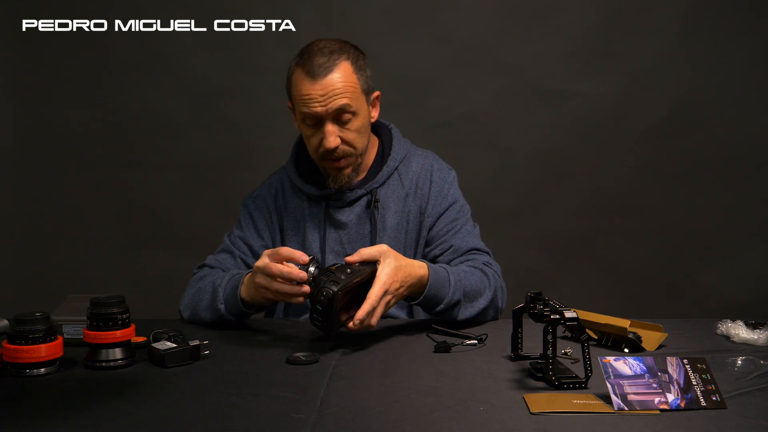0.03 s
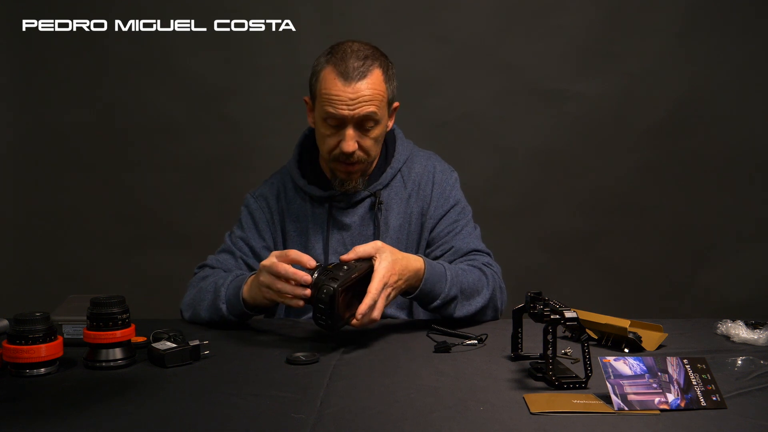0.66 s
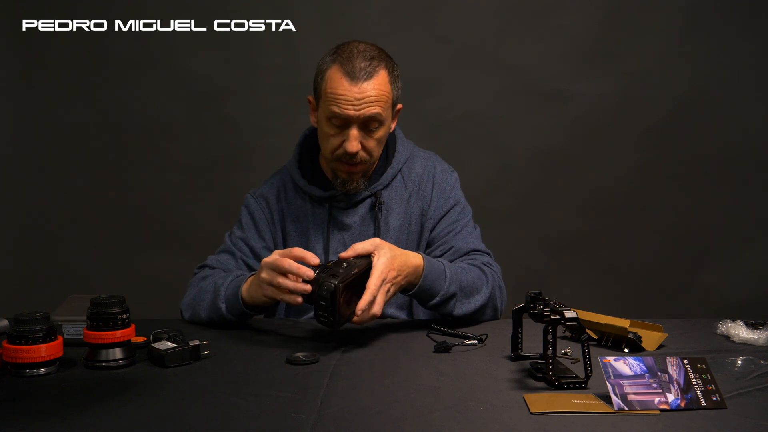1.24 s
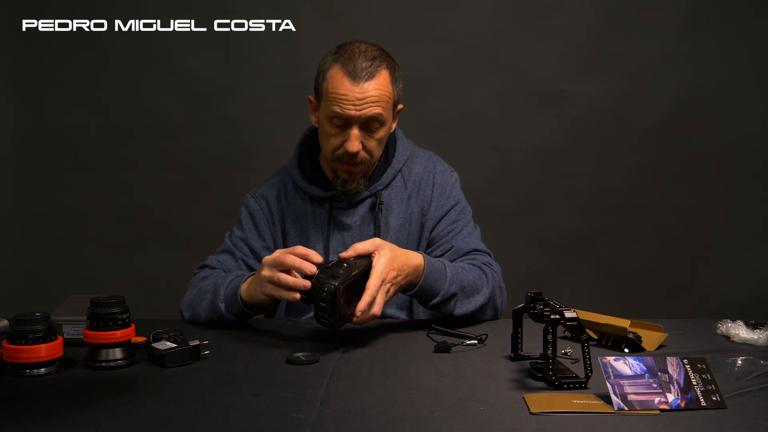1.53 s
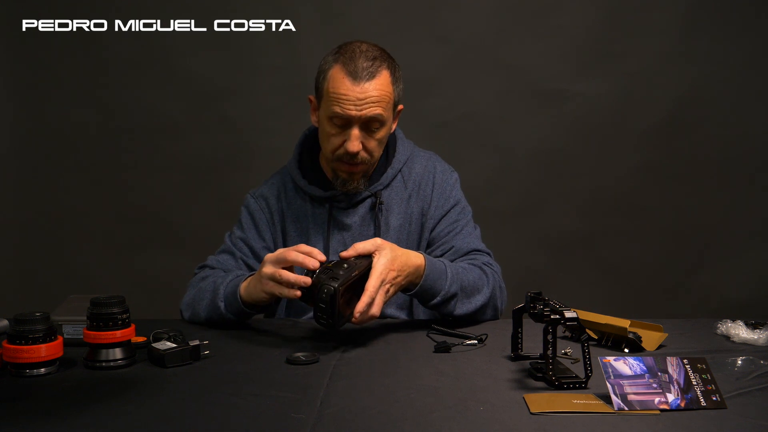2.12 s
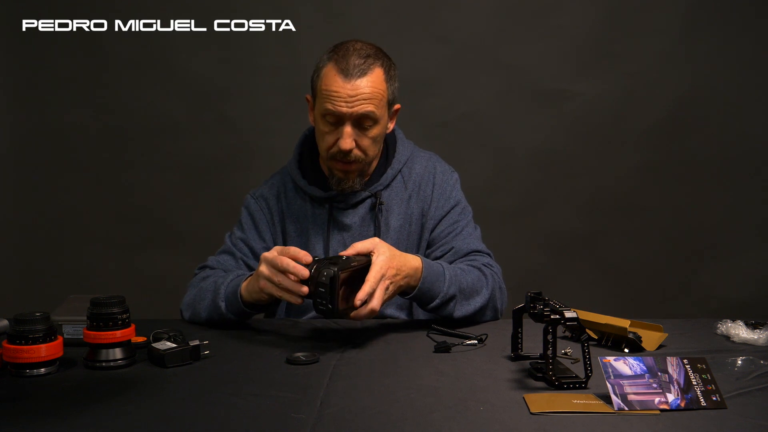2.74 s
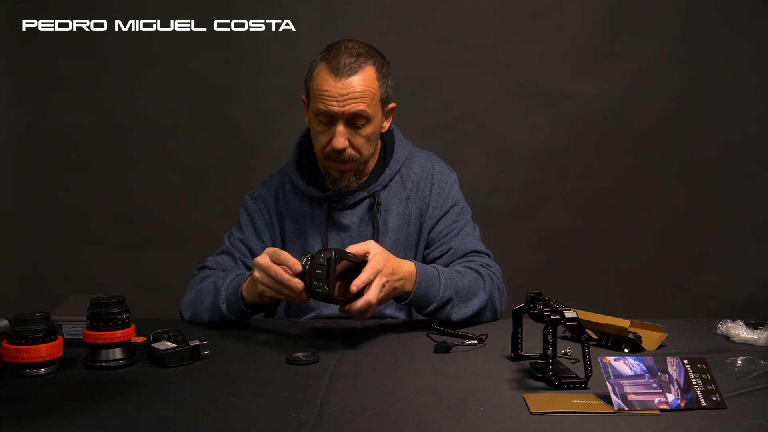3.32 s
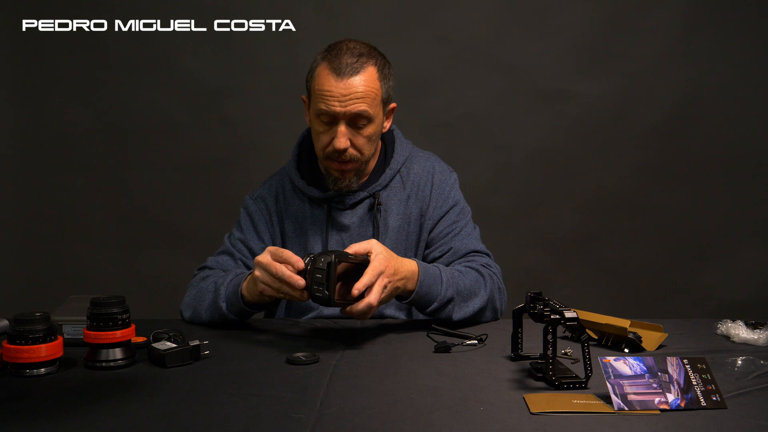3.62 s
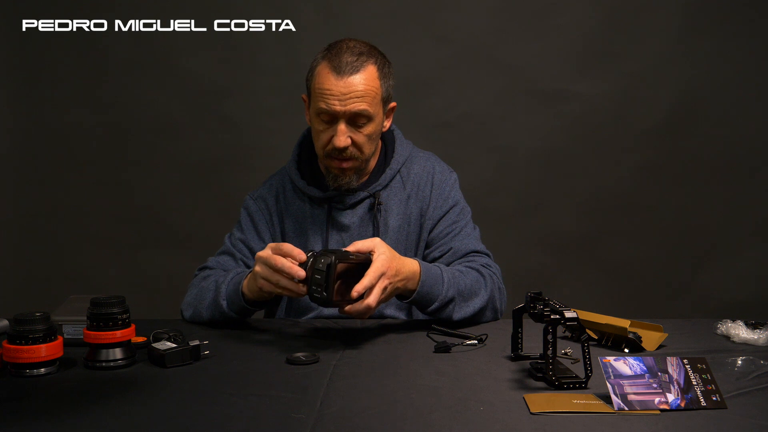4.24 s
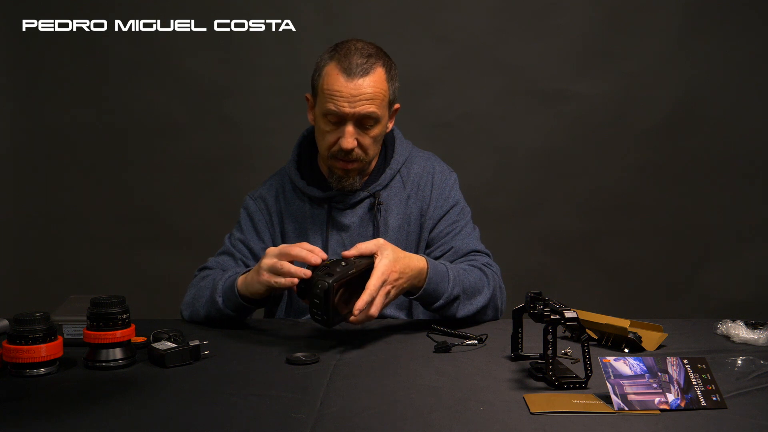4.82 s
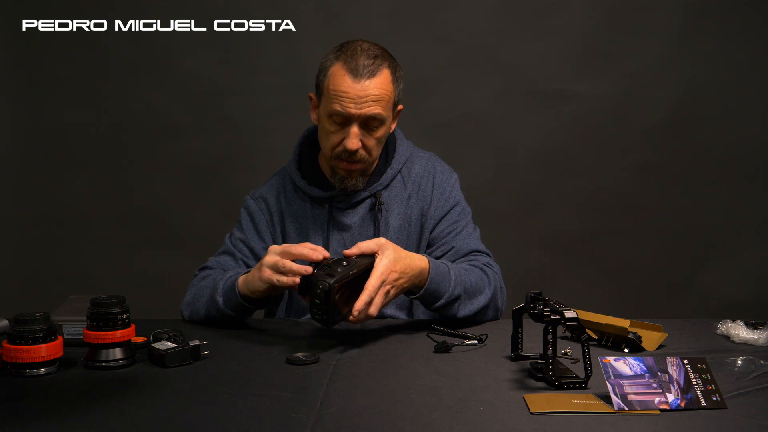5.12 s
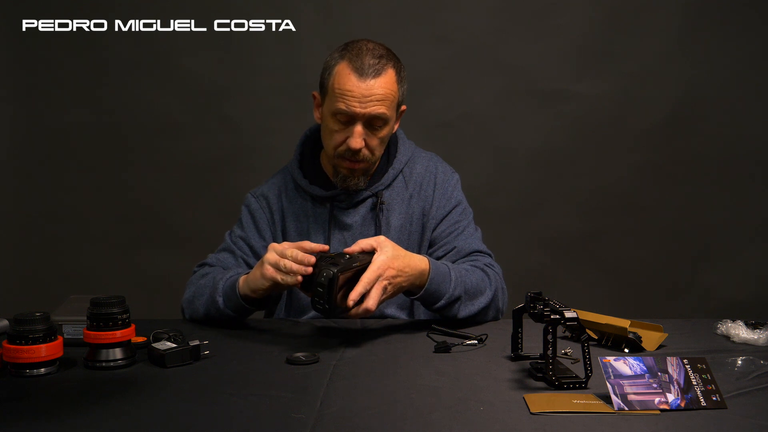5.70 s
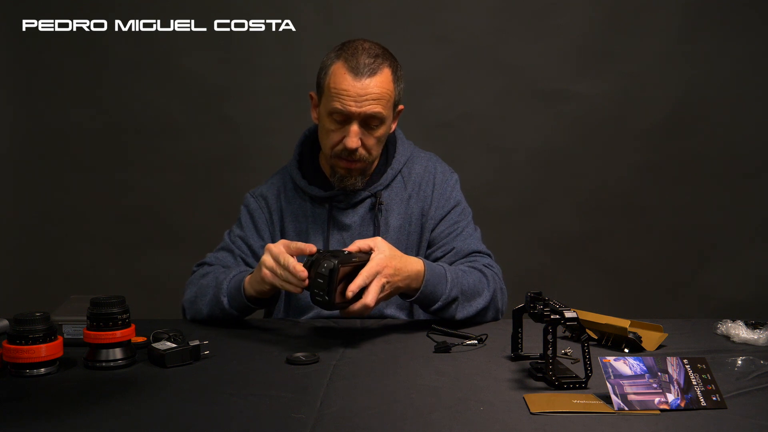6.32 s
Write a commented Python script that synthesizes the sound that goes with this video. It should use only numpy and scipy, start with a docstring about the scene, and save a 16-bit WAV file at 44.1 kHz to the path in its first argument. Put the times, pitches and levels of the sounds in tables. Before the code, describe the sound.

A metal adapter knocks and scrapes lightly in a camera's mount, then snaps into place, over a faint fan hum.

```python
"""A metal adapter knocks and scrapes in a camera's mount, then bayonet and latch snap home.
Each knock is a hollow body thud, a casing clack and an edge tick; the scrapes are tiny slips shaking
the same parts. Lugs set the mount ringing, and small bright metal clicks end in the snap of the latch.
Fingertips glide on the shell, a sleeve drags over the table cloth at the end,
and a fan hums faintly under it all in a quiet room."""
import sys
import numpy as np
from scipy import signal
from scipy.fft import rfft, irfft
from scipy.io import wavfile

SR = 44100
rng = np.random.default_rng(int(sys.argv[2]) if len(sys.argv) > 2 else 0)


def digitize_waveform(pressure):
    """Quantize a signal to 16-bit integers and store it at the path in sys.argv[1].

    Rows of a 2-D input are taken as channels; values are limited to [-1, 1].
    """
    field = np.atleast_2d(pressure).T
    bounded = np.clip(field, -1, 1)
    quanta = np.round(bounded * 32767).astype(np.int16)
    wavfile.write(sys.argv[1], SR, quanta)


N = 280476

# the adapter bumping in the mount:
# (time [s], relative level [dB], hardness: clack against thud [dB], depth: low-mode lift [dB])
KNOCKS = [(.685, -50, 3.5, 10), (.926, -33.5, -9, -4), (1.094, -50, -5, 27), (1.139, -54, -3, 33),
          (1.241, -56, -16, 25), (1.91, -48, -12, 15), (2.297, -45, -9.5, 7), (2.319, -43, -4, 11.5),
          (2.5957, -31, -8.5, -3), (2.732, -44, -9, 10), (2.77, -44, -11, 11), (2.846, -36, -9.5, 13.5),
          (3.006, -42, -10, -10), (3.189, -45, -5.5, 0), (3.2, -33, -3.5, 4), (3.258, -47, -14, 12),
          (3.41, -56, 1.5, 17), (3.485, -42.5, -5.5, 12), (3.534, -41, -7, 6), (3.59, -44.5, 4.5, 18),
          (3.79, -46, -5.5, 2), (3.808, -40, 2.5, 4), (3.935, -49, -6.5, 16), (4.088, -45.5, 3, 19),
          (4.155, -50, -16, -1), (4.202, -51, -3, 14), (4.323, -38.5, 1.5, -12), (4.53, -43, -8, 4),
          (4.574, -36.5, -9, 10), (4.717, -46.5, -4.5, 18), (4.763, -43.5, -8, 1), (4.932, -44.5, 2.5, 23),
          (4.949, -30, -1.5, 6), (4.9785, -34, 2.5, 14), (4.998, -30, -0.5, 5.5),
          (5.2557, -28.5, -0.5, -11), (5.2665, -30, 0.5, 9), (5.817, -53, -5.5, 30)]
def knocks(size=6000):
    """The adapter hits the mount, then lands once more in a weaker rebound."""
    rebound_s, rebound_db, scatter = 0.009, -12, 0.206
    t, out = np.arange(size) / SR, np.zeros(N)
    for s, db, hardness_db, depth_db in KNOCKS:
        again = s + rebound_s * (1 + scatter * rng.uniform(-1.01, 1))
        add(out, s, contact(t, db, hardness_db, depth_db))
        add(out, again, contact(t, db + rebound_db, hardness_db, depth_db))
    return out


# modes of the hollow body and of the casing's panels: (frequency [Hz], level [dB], t60 [s])
BODY_MODES = [(248, -6.5, 0.013), (341, -10.5, 0.037), (411, -6.5, 0.031), (471.7, -2, 0.052),
              (540.5, -1, 0.055), (578.5, 3, 0.036), (646, -10, 0.063), (772, -10.5, 0.065)]
PANEL_MODES = [(904.6, -5.5, 0.11), (1050, 4.5, 0.031), (1247, -2.5, 0.054), (1382, 0.5, 0.044),
               (1458.5, 8.5, 0.029), (1670, -10, 0.028), (1979, -6.5, 0.033), (2226, -1.5, 0.025),
               (2230, -25.5, 0.019)]
# dense, fast modes of the casing and of the hard edges that meet: (frequency [Hz], level [dB])
CLACK_EQ = [(40, -37), (150, -31.5), (400, -2), (800, 4.5), (1450, -7), (1750, -9.5), (2350, -10),
            (2800, -15.5), (3400, -23), (8000, -38)]
TICK_EQ = [(500, -25), (2500, 16), (3300, 0.5), (4200, 5.5), (5200, -4.5), (6300, 5.5), (8000, -0.5),
           (11500, -4.5), (16000, -38)]
def contact(t, thud_db, hardness_db, depth_db):
    """One hit in three layers: a thud in the body, a clack in the casing, a tick at the edge."""
    clack_db = thud_db + hardness_db
    tick_db = -67 + 1.48 * (clack_db + 46.5)  # the tick grows faster than the clack
    body = ringing(BODY_MODES, t, depth_db=depth_db, detune=0.0098)
    body *= attack(t, 0.0031)  # the heavy body takes up the blow slowly
    thud = amp(thud_db - 3) * blow(radiated(body, cut_hz=354))
    casing = blow(colour(chatter(t, fast_s=0.0027, slow_s=0.0086, slow_db=-10), CLACK_EQ))
    panels = blow(ringing(PANEL_MODES, t, depth_db=2, detune=0.011) * attack(t, 0.00078))
    clack_hz = 2700 * amp(0.42 * hardness_db)  # dull bumps are darker than hard strikes
    clack = amp(clack_db - 1.5) * blow(cushioned(casing + amp(-3.5) * panels, clack_hz))
    edge = colour(chatter(t, fast_s=0.00052, slow_s=0.007, slow_db=-7.5), TICK_EQ)
    tick_hz = 8500 * amp(0.16 * (tick_db + 59))  # faint ticks are darker than loud ones
    tick = amp(tick_db) * blow(cushioned(edge, tick_hz))
    return thud + clack + tick


# small metal clicks: (time [s], level [dB])
CLICKS = [(1.094, -59), (3.532, -52), (3.591, -57), (4.3238, -59), (4.9493, -42), (4.983, -38),
          (5.2673, -30.5)]
# their bright tone: (frequency [Hz], level [dB])
CLICK_EQ = [(200, -54), (1500, 27), (3000, 6), (5000, -21), (7800, 6), (11000, 1.5), (13000, -1.5),
            (16000, -15)]
def metal_clicks(size=3000):
    """Small bright metal clicks, the last and loudest being the latch snapping home."""
    t, out = np.arange(size) / SR, np.zeros(N)
    for s, db in CLICKS:
        force = chatter(t, fast_s=0.0024, slow_s=0.003, slow_db=-25)
        add(out, s, amp(db) * blow(colour(force, CLICK_EQ)))
    return out


# the bayonet lugs striking the mount: (time [s], level [dB])
LUG_HITS = [(2.5967, -59), (3.2, -51), (3.533, -56.5), (3.591, -57), (3.808, -51), (4.088, -70),
            (4.541, -52.5), (4.95, -36), (4.998, -47.5), (5.2557, -49), (5.2667, -40.5)]
# modes of the metal mount: (frequency [Hz], level [dB], t60 [s])
MOUNT_MODES = [(2882, -7.5, 0.048), (2980, -13.5, 0.038), (3720, -21.5, 0.038), (4430, -25.5, 0.029),
               (4600, -19.5, 0.036), (5880, -17, .03), (7200, -20, 0.032)]
def mount_rings(size=4000):
    """Each lug sets the mount ringing, a metallic ping that blooms over a few milliseconds."""
    t, out = np.arange(size) / SR, np.zeros(N)
    for s, db in LUG_HITS:
        ring = ringing(MOUNT_MODES, t, depth_db=0, detune=0.0017) * attack(t, 0.0063)
        add(out, s, amp(db) * blow(ring))
    return out


# the parts sliding: (time [s], length [s], relative drag level [dB], relative hiss level [dB])
SLIDES = [(1.062, 0.14, -66, -95), (1.674, 0.058, -58.5, -65), (1.882, .09, -61, -79),
          (2.5, 0.076, -49.5, -63), (2.66, 0.16, -55.5, -65.5), (2.983, 0.25, -61.5, -67),
          (3.25, 0.2, -58.5, -76), (3.467, 0.066, -44.5, -66), (3.512, .018, -41.5, -47),
          (3.948, 0.21, -58.5, -80), (4.256, 0.044, -55, -60.5), (4.38, 0.14, -56, -61),
          (4.518, 0.062, -42.5, -53.5), (4.72, 0.088, -51.5, -65)]
# the hiss of the rubbing surfaces: (frequency [Hz], level [dB])
SCRAPE_EQ = [(200, -26.5), (900, -18.5), (1150, 20.5), (1300, -4.5), (1490, 19.5), (1680, 9.5), (2000, 7.5),
             (2600, -4), (2950, 3.5), (3500, -8.5), (4300, -9), (5200, -9), (6500, -6), (8500, -16.5),
             (15000, -21.5)]
def sliding(size=4000):
    """Slips between the turning parts shake body and panels, hiss, and faintly ring the mount."""
    graze_s, graze_db = 0.01, -18.5  # the parts graze each other just before a knock
    grazes = [(s - graze_s, graze_s, db + graze_db, db + hardness_db + graze_db)
              for s, db, hardness_db, _ in KNOCKS]
    strokes = SLIDES + grazes
    drag_gain = stroked([(s, length, db) for s, length, db, _ in strokes])
    hiss_gain = stroked([(s, length, db) for s, length, _, db in strokes])
    slips = friction(per_s=770, spread_db=2.5, smooth=0.39)
    slips *= amp(2.5 * waver(per_s=39))  # the fingers press unevenly
    t = np.arange(size) / SR
    damping = np.exp(-t / 0.048) * attack(t, 0.0014)  # pressing fingers shorten every ring
    rings = [ringing(modes, t, depth_db=5.5, detune=0.0059) * damping
             for modes in (BODY_MODES, PANEL_MODES, MOUNT_MODES)]
    body, panels, mount = (unit_rms(signal.fftconvolve(slips, ring)[:N]) for ring in rings)
    drag = amp(-2.5) * radiated(body, cut_hz=260) + amp(-28) * mount
    hiss = amp(3) * unit_rms(colour(slips, SCRAPE_EQ)) + panels
    return drag_gain * drag + hiss_gain * hiss


# short pulls of the sleeve: (time [s], length [s], relative level [dB])
SLEEVE_PULLS = [(6.01, 0.014, -57.5), (6.07, 0.059, -57.5), (6.15, 0.1, -56), (6.275, 0.077, -55.5)]
# the rustle of cloth on cloth: (frequency [Hz], level [dB])
CLOTH_EQ = [(10, 9), (28, 18), (60, -9), (300, -20), (900, 3), (1700, 1.5), (2300, 7.5), (2900, 1),
            (3500, -4), (6000, -7), (7400, -0.5), (9000, -12.5), (11500, -10), (15000, -26)]
def sleeve():
    """The sleeve drags over the table cloth, catching and letting go as it moves."""
    rustle = rub(SLEEVE_PULLS, CLOTH_EQ, per_s=2500, spread_db=-1.5)
    return rustle * amp(2 * waver(per_s=83))


# fingertip glides: (time [s], length [s], relative level [dB])
GLIDES = [(2.6, 0.11, -68), (2.88, 0.23, -68.5), (4.4, 0.064, -65), (4.67, 0.075, -62.5)]
# the whisper of skin on the shell: (frequency [Hz], level [dB])
SKIN_EQ = [(1000, -5), (5200, -10.5), (6500, -1.5), (7400, -9.5), (8700, -11), (10000, -15), (15000, -23)]
def fingertips():
    """Skin ridges catch and slip on the camera's shell."""
    return rub(GLIDES, SKIN_EQ, per_s=1000, spread_db=3)


# the steady bed of air noise: (frequency [Hz], level [dB])
AIR_EQ = [(10, 0), (25, 1.5), (60, -3.5), (130, -5.5), (210, -4), (330, -0.5), (430, -4.5), (580, 4),
          (950, 3.5), (1250, 1.5), (1700, -8), (3200, -18), (5500, -20), (7100, -14.5), (9000, -21),
          (15500, -23)]
# the fan's hum: (frequency [Hz], level [dB])
FAN_TONES = [(334, -82), (582, -68), (749, -71), (796, -108.5), (893, -71.5), (1165, -70.5)]
def fan():
    """Moving air under a few tones that waver in level and pitch."""
    hum = np.zeros(N)
    for hz, db in FAN_TONES:
        peak = np.sqrt(2) * amp(db + 0.81 * waver(per_s=6.2))
        pitch_hz = hz + 3.96 * waver(per_s=11.55)
        hum += peak * np.sin(2 * np.pi * np.cumsum(pitch_hz) / SR)
    return hum + amp(-62) * noise(AIR_EQ)


# the room's reverb time: (frequency [Hz], t60 [s])
ROOM_DECAY = [(150, 0.43), (600, 0.44), (1500, 0.49), (3000, 0.47), (7000, 0.5), (15000, 0.16)]
# early reflections off table and walls: (delay [s], gain [linear])
ECHOES = [(.0052, 0.023), (.0088, 0.023), (.0141, .12)]
def room(x, tail_db, size=256, count=3):
    """The direct sound, a few near echoes and a shifting diffuse tail whose top end dies first."""
    fades_per_s = 9  # how fast the reverb tails crossfade, so no single pitch lingers
    out, now = x.copy(), np.arange(N) / SR
    for k in range(count):
        hz, t, bands = signal.stft(rng.standard_normal(SR // 2), SR, nperseg=size)
        decay = amp(-60 * t / curve_at(ROOM_DECAY, hz)[:, None])
        tail = signal.istft(bands * decay * attack(t, 0.023), SR, nperseg=size)[1]
        crossfade = np.sqrt(2 / count) * np.cos(np.pi * (fades_per_s * now + k / count))
        out += amp(tail_db) * signal.fftconvolve(x * crossfade, tail / np.linalg.norm(tail))[:N]
    for delay, gain in ECHOES:
        add(out, delay, gain * x)
    return out


def ringing(modes, t, depth_db, detune):
    """Dying sines; a broad push lifts the lows by depth_db, and each grip retunes the modes a little."""
    hz, db, t60 = np.transpose(modes)[:, :, None]
    weight, shift = rng.standard_normal((2, len(modes), 1))
    db = db + 2 * weight + depth_db / (1 + (hz / 470) ** 10)
    return (amp(db - 60 * t / t60) * np.cos(2 * np.pi * hz * (1 + detune * shift) * t)).sum(0)


def chatter(t, fast_s, slow_s, slow_db):
    """The force of a contact: a quick rise, a sharp burst, then a weaker fading rattle."""
    decay = np.exp(-t / fast_s) + amp(slow_db) * np.exp(-t / slow_s)
    return rng.standard_normal(len(t)) * decay * attack(t, 0.00011)


def friction(per_s, spread_db, smooth):
    """Countless tiny slips of uneven size over a smooth hiss."""
    sizes = amp(spread_db * np.minimum(rng.exponential(1, N), 4)) * rng.choice([-1, 1], N)
    slips = sizes * (rng.random(N) < per_s / SR)
    return unit_rms(slips) + smooth * rng.standard_normal(N)


def rub(strokes, eq, per_s, spread_db):
    """Fibres or skin ridges catch and let go while a stroke lasts."""
    grain = colour(friction(per_s, spread_db, smooth=0.5), eq)
    return amp(-4) * stroked(strokes) * unit_rms(grain)


def stroked(strokes, attack_s=0.018, release_s=0.016):
    """Gain envelope of strokes: each swells, holds and dies away."""
    t, gain = np.arange(SR) / SR, np.zeros(N)
    for s, length, db in strokes:
        release = np.exp(-np.maximum(t - length, 0) / release_s)
        add(gain, s, amp(db) * np.minimum(t / attack_s, 1) * release)
    return gain


def radiated(x, cut_hz):
    """A small object radiates almost no bass."""
    return signal.sosfilt(signal.butter(2, cut_hz, "highpass", fs=SR, output="sos"), x)


def cushioned(x, hz):
    """A longer, softer contact takes the top off a blow."""
    return signal.sosfilt(signal.butter(2, min(hz, SR / 3), fs=SR, output="sos"), x)


def colour(x, eq, size=4096):
    """Minimum-phase EQ, so that attacks stay sharp."""
    log_gain = np.log(amp(curve_at(eq, abs(np.fft.fftfreq(size, 1 / SR)))))
    taps = np.fft.ifft(np.exp(np.conj(signal.hilbert(log_gain)))).real
    return signal.fftconvolve(x, taps[:size // 2])[:len(x)]


def curve_at(points, hz):
    """Points joined by straight lines over log frequency."""
    f, value = np.transpose(points)
    return np.interp(np.log(hz + 1), np.log(f + 1), value)


def noise(eq):
    """Steady coloured noise of rms 1."""
    return unit_rms(colour(rng.standard_normal(N), eq))


def waver(per_s):
    """A slow random curve of rms 1."""
    lowpass = np.exp(-(np.fft.rfftfreq(N, 1 / SR) / per_s) ** 2)
    return unit_rms(irfft(rfft(rng.standard_normal(N)) * lowpass, N))


def blow(x, size=441):
    """Scales a short sound to the energy of 10 ms at rms 1."""
    return x * np.sqrt(size / np.sum(x ** 2))


def attack(t, rise_s):
    return 1 - np.exp(-t / rise_s)


def amp(db):
    return 10 ** (np.asarray(db) / 20)


def unit_rms(x):
    return x / np.sqrt(np.mean(x ** 2) + 1e-20)


def add(mix, s, sound):
    part = mix[round(s * SR):][:len(sound)]
    part += sound[:len(part)]


def scene():
    """A mono mix on both channels; the small steel parts face the listener and sound drier."""
    rustles = sleeve() + fingertips()
    handling = room(knocks() + sliding() + rustles, tail_db=-14.5)
    steel = room(mount_rings() + metal_clicks(), tail_db=-21)
    mono = handling + steel + fan()
    return np.array([mono, mono])


# each preamplifier's noise floor: (frequency [Hz], level [dB])
PREAMP_EQ = [(30, 3.5), (170, 9), (500, -8), (1500, -14), (5000, -6), (10000, 3), (15000, 7.5)]
def record(dry):
    """A trace of hiss and rumble in each channel, then a steep high cut."""
    floor = amp(-79) * np.array([noise(PREAMP_EQ) for _ in dry])
    high_cut = signal.firwin(511, cutoff=15880, window=("kaiser", 9), fs=SR)
    return signal.oaconvolve(dry + floor, high_cut[None], "same", axes=1)


dry = scene()
out = record(dry)
digitize_waveform(out)
```